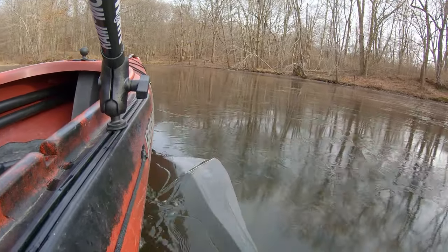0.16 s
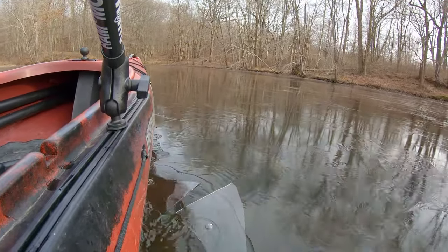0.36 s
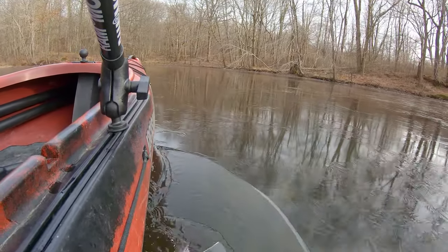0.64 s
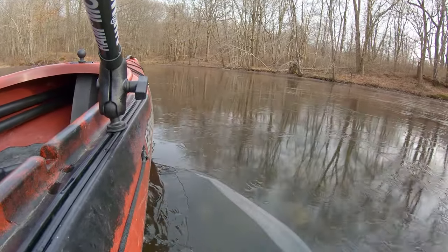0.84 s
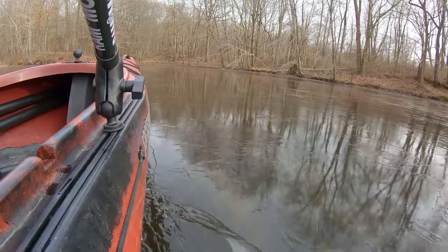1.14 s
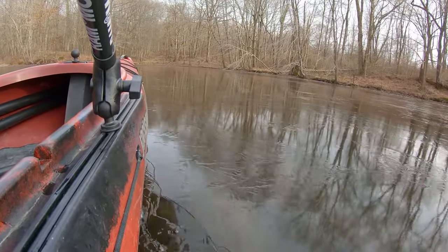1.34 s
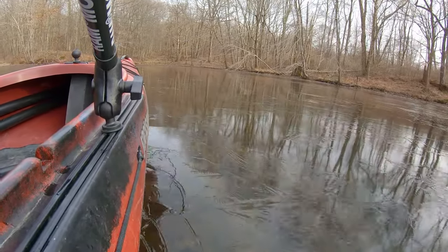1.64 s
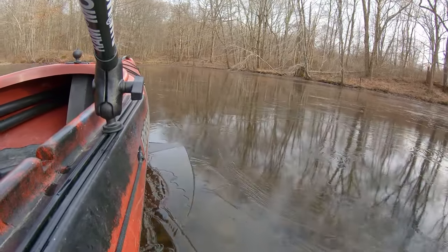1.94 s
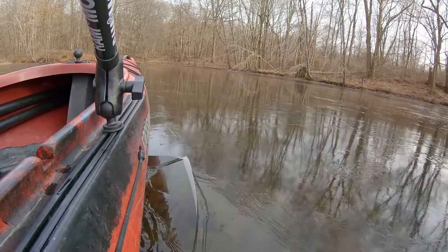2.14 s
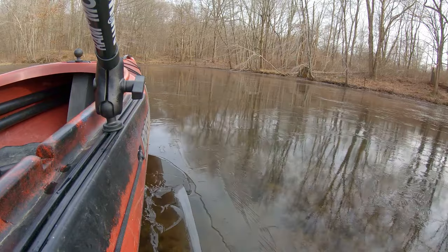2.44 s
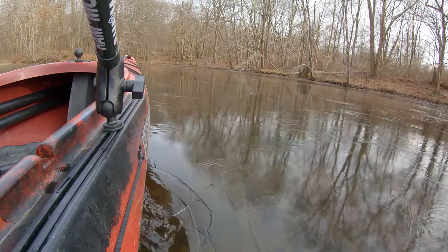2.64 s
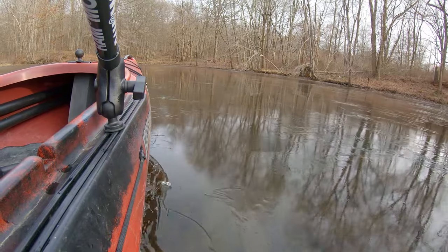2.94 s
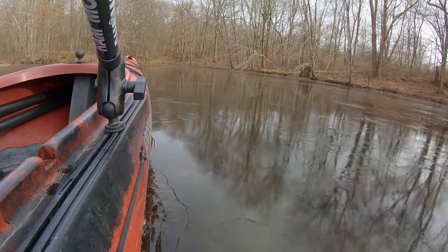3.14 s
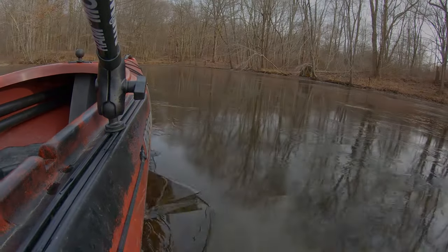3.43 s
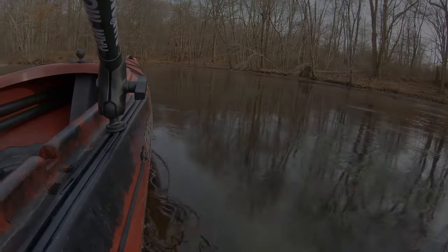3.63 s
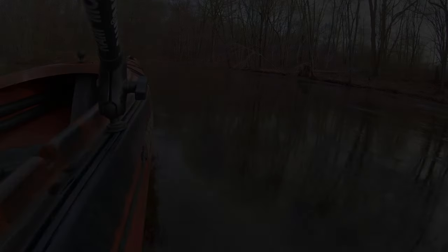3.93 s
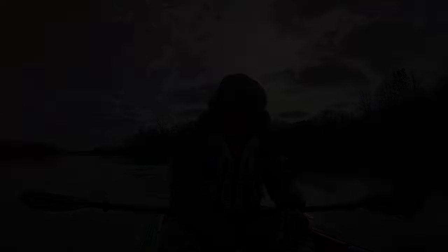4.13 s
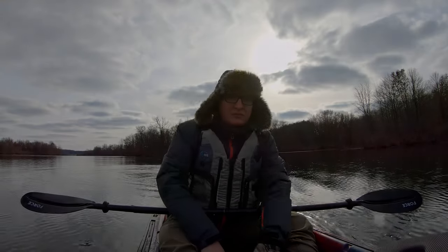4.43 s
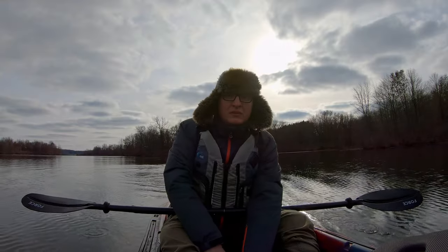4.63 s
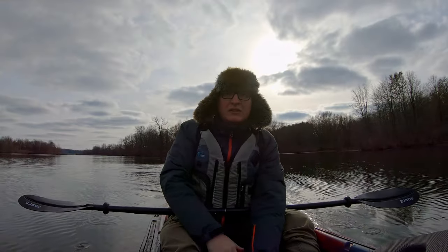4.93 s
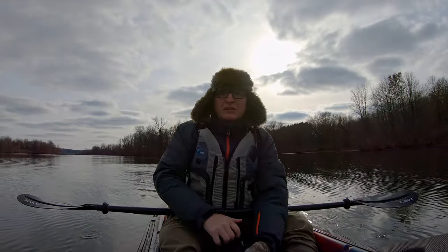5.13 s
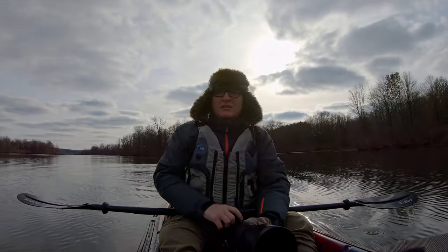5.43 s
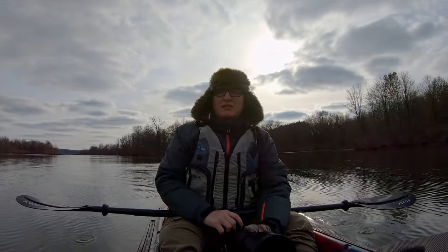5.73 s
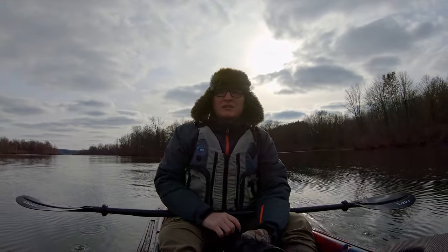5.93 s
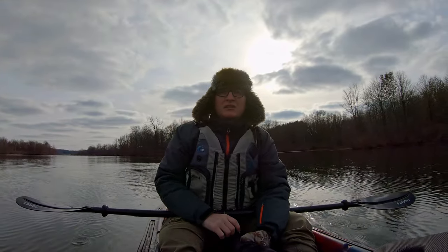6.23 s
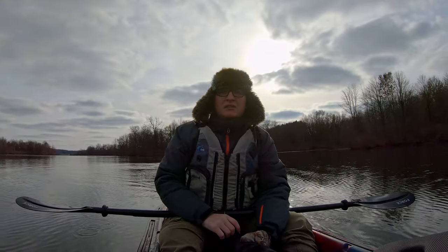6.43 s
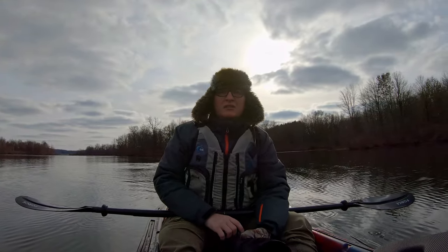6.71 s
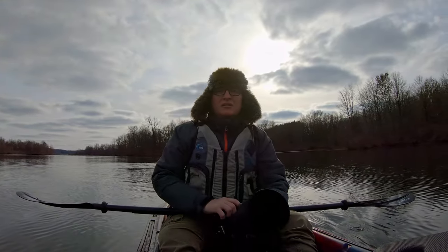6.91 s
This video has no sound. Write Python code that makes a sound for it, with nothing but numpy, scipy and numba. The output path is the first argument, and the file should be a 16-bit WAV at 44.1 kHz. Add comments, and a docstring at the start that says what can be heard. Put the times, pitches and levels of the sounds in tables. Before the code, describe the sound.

Close to a plastic kayak hull, thin ice cracks, crunches and splinters over a low heaving rumble and dull grinding, with pieces knocking on plastic. It weakens and cuts to a short silence. Then quiet open water: wind buffeting the microphone, a sleeve rasping on cloth, something heavy scraping and thumping down in the hull, a few small knocks, and very faint distant bird whistles.

```python
"""On a frozen lake a plastic kayak ploughs through thin ice: the hull rumbles and grinds, slabs crack and splinter.
The sound fades to silence, then returns on open water: wind at the microphone, a sleeve sliding over cloth,
something heavy set down in the hull, small knocks, a far bird and a faint squeak.
Friction and wind are shaped noise, fracture is a random rain of noise grains, and struck bodies are damped modes."""
import sys
import numpy as np
from scipy import signal
from scipy.fft import rfft, irfft
from scipy.io import wavfile
from scipy.ndimage import uniform_filter1d
from numba import njit

SR = 44100
rng = np.random.default_rng(int(sys.argv[2]) if len(sys.argv) > 2 else 0)


def master(y):
    """Save y as 16-bit WAV."""
    cut = np.clip(np.atleast_2d(y).T, -1, 1)
    pcm = np.round(cut * 32767)  # scale
    wavfile.write(sys.argv[1], SR, pcm.astype(np.int16))


N = 311787
T = np.arange(N) / SR  # s
FADE_OUT_S, FADE_OUT_DB = (3.968, 4.128), -19.5  # the ploughing sinks this far, then cuts


def undb(db):
    """Level law: decibels to amplitude."""
    return 10 ** (np.asarray(db) / 20)


def unit(x):
    """Normalization: rms 1."""
    return x / np.sqrt(np.mean(x ** 2))


def curves(table):
    """Linear interpolation: columns along the time axis, and a gate open only inside the table."""
    s, *columns = np.transpose(table)
    return [np.interp(T, s, c) for c in columns], (T >= s[0]) & (T <= s[-1])


def colour(x, spectrum, size=8192):
    """Minimum-phase filtering: the cepstrum gives a causal response; white noise keeps its level."""
    hz, db = np.transpose(spectrum)
    f = np.maximum(np.arange(size // 2 + 1) * SR / size, 1)
    density_db = np.maximum(np.interp(np.log(f), np.log(hz), db), -130)
    cepstrum = irfft(np.log(undb(density_db)))
    # fold the anticausal half onto the causal half
    cepstrum[1:size // 2] *= 2
    cepstrum[size // 2 + 1:] = 0
    response = irfft(np.exp(rfft(cepstrum)))
    return signal.fftconvolve(x, response / np.sqrt(np.sum(response ** 2)))[:N]


def dull(x, hz):
    """Low-pass transmission: thick plastic and water carry no treble."""
    return signal.sosfilt(signal.butter(4, hz, fs=SR, output="sos"), x)


@njit
def band(x, hz, sharp):
    """Resonance: a state-variable band-pass whose centre may move, with gain 1 at the centre."""
    y, band_state, low_state = np.empty(len(x)), 0., 0.
    for i in range(len(x)):
        g = np.tan(np.pi * hz[i] / SR)
        v = (band_state + g * (x[i] - low_state)) / (1 + g * (g + 1 / sharp))
        band_state = 2 * v - band_state
        low_state = low_state + 2 * g * v
        y[i] = v / sharp
    return y


def ring(x, hz, t60):
    """Modal decay: one damped mode, driven by x."""
    pole = np.exp(2j * np.pi * hz / SR - np.log(1000) / (t60 * SR))
    return signal.lfilter([1], [1, -pole], x).imag


def walk(rate):
    """Slow random modulation: values held 1 / rate s and slewed twice; rms 1."""
    hold = int(SR / rate)
    steps = np.repeat(rng.standard_normal(N // hold + 1), hold)
    return unit(uniform_filter1d(uniform_filter1d(steps, hold), hold)[:N])


def rain(rate, scatter_db, tail_s):
    """Shot process: envelope of a rain of tiny fractures, each with a short tail; rms 1."""
    size = np.minimum(rng.exponential(size=N), 4.5)
    hits = (rng.random(N) < rate / SR) * undb(scatter_db * size) ** 2
    power = signal.lfilter([1], [1, -np.exp(-1 / (tail_s * SR))], hits)
    return unit(np.sqrt(power))


def grit(rate, scatter_db, tail_s):
    """Modulated noise: white noise shaken by the rain of fractures."""
    return rain(rate, scatter_db, tail_s) * rng.standard_normal(N)


def bursts(times, dbs, lengths, rise_s=0.00053):
    """Transient noise: bursts rise quickly, lose 60 dB over their length, and add in power."""
    power = np.zeros(N)
    for s, db, length in zip(*np.broadcast_arrays(times, dbs, lengths)):
        i = int(s * SR)
        t = T[:min(int(2 * length * SR) + 2, N - i)]
        fall = undb(db - 60 * t / length)
        power[i:i + len(t)] += (fall * (1 - np.exp(-t / rise_s))) ** 2
    return np.sqrt(power) * rng.standard_normal(N)


def thuds(table, cycles):
    """Damped oscillation: soft low rings that build over about a cycle."""
    out = np.zeros(N)
    for s, db, hz in table:
        i = int(s * SR)
        turns = hz * T[:int(6 * cycles / hz * SR)]
        envelope = np.exp(-turns / cycles) * (1 - np.exp(-turns / 0.51))
        tone = envelope * np.sin(2 * np.pi * turns)
        out[i:i + len(turns)] += undb(db) * tone / tone.max()
    return out


def struck(table, push_s, rough):
    """Impact excitation: one mode a row, rung by a short push that rattles a little."""
    out = np.zeros(N)
    shape = np.exp(-T[:200] / push_s)
    for (start, db, hz, t60), noise in zip(table, rng.standard_normal((len(table), 200))):
        i = int(start * SR)
        push = shape * (rough * noise - shape ** 2)
        tone = ring(np.pad(push, (0, 4000)), hz, t60)
        out[i:i + len(tone)] += undb(db) * tone / np.abs(tone).max()
    return out


def pings(count, low_hz, high_hz, cycles, glide):
    """Rising resonance: damped tones at random moments and pitches up to the fade-out's end; rms 1 there."""
    out = np.zeros(N + SR)
    for when, pitch, size in rng.random((count, 3)):
        hz = low_hz * (high_hz / low_hz) ** pitch
        turns = hz * T[:int(5 * cycles / hz * SR)]
        i = int(when * FADE_OUT_S[1] * SR)
        shape = np.exp(-turns / cycles) * (1 - np.exp(-turns))
        tone = np.sin(2 * np.pi * turns * (1 + glide * turns / cycles))
        out[i:i + len(turns)] += size ** 2 * low_hz / hz * shape * tone  # higher pings are weaker
    return out[:N] / np.sqrt(np.sum(out ** 2) / (FADE_OUT_S[1] * SR))


def whistle(start, end, from_hz, to_hz, db):
    """Frequency modulation: a sine that swells and dies while it glides, its level fluttering."""
    phase = 2 * np.pi * np.cumsum(np.interp(T, [start, end], [from_hz, to_hz])) / SR
    swell = np.sqrt(np.abs(np.sin(np.pi * np.clip((T - start) / (end - start), 0, 1))))
    return undb(db) * swell * undb(2 * walk(46)) * np.sin(phase)


# In the tables below levels and lengths are relative: the functions scale them.
# the bow ploughs on (also drives grinding and ice): start_s, rumble_db, grind_db, crunch_db, shards_db, splinters_db
PLOUGH = [(0.0, -25.5, -30, -38, -47, -54), (0.03, -36.5, -36, -43, -65, -77),
          (0.16, -31.5, -36.5, -42.5, -51, -62), (0.22, -34.5, -39, -46, -65, -78),
          (0.41, -33.5, -35.5, -42.5, -54, -64), (0.46, -27, -36.5, -44, -64, -74),
          (0.53, -31.5, -32, -43, -46, -62), (0.6, -31, -31, -44.5, -50.5, -66),
          (0.74, -31, -38, -38.5, -53, -74), (0.79, -29.5, -37, -44, -59, -68),
          (0.84, -41, -30, -40.5, -52, -66), (0.98, -30, -31, -40.5, -59, -69),
          (1.17, -34.5, -35.5, -44.5, -58, -69), (1.2, -32, -32, -38.5, -52, -60),
          (1.33, -27.5, -28, -39.5, -55.5, -64.5), (1.42, -27.5, -34.5, -40.5, -53, -65),
          (1.48, -31.5, -31, -39.5, -56, -63), (1.71, -34.5, -35, -47.5, -62.5, -67.5),
          (1.99, -29.5, -33, -45.5, -61, -71), (2.06, -29, -34.5, -42, -60.5, -70),
          (2.23, -28, -36, -44, -62, -71), (2.49, -32, -35.5, -44, -60.5, -69),
          (2.6, -30.5, -37, -46.5, -65, -72), (3.12, -32.5, -37.5, -46, -67, -74),
          (3.24, -39, -40.5, -52, -65, -70), (3.36, -37, -37, -39.5, -59, -65),
          (3.39, -34.5, -40, -48.5, -71, -76), (3.45, -42, -41, -43.5, -60, -67),
          (3.53, -41, -40, -47.5, -70, -79.5), (3.66, -57, -45, -56, -62, -77.5),
          (3.68, -41, -40.5, -44, -56, -61), (3.71, -49, -46, -54.5, -72.5, -75.5),
          (3.94, -46.5, -53, -56, -69, -77)]
# rumble spectrum: freq_hz, density_db
RUMBLE_SPECTRUM = [(12, -38), (20, -23.5), (49, -11.5), (75, -0.5), (91, 2), (252, -5), (400, -18),
                   (520, -21.5), (880, -120)]
# slabs bump the hull: start_s, level_db, pitch_hz
BUMPS = [(0.11, -32, 245), (0.276, -25.5, 124.4), (0.369, -22, 99), (0.535, -31, 117), (0.757, -20, 226),
         (0.939, -26.5, 237), (1.11, -43, 93), (1.182, -23.5, 128), (1.591, -21, 167), (1.861, -24, 93),
         (2.002, -27, 87.4), (2.062, -27, 201), (2.334, -22, 93.8), (2.401, -26.5, 96),
         (2.544, -22.5, 96.5), (2.657, -23, 98), (2.741, -27, 104), (2.996, -25.5, 100), (3.329, -32, 136),
         (3.594, -41, 174), (3.679, -33, 286), (3.775, -47, 91), (3.813, -38, 89), (3.912, -39, 264)]
BOOM_HZ, PANEL_HZ = 129.8, 353
WANDER = .13  # pitches wander by this share as the ice presses elsewhere


def hull():
    """Forced vibration: broad rumble that heaves, a boom whose pitch wanders, and slabs that bump."""
    (rumble_db, *_), _ = curves(PLOUGH)
    gain = undb(rumble_db + 1.16 * walk(13))
    rumble = colour(gain * rng.standard_normal(N), RUMBLE_SPECTRUM)
    boom_hz = BOOM_HZ * np.exp(WANDER * walk(12))
    boom = unit(dull(band(rng.standard_normal(N), boom_hz, 11.8), 400))
    return rumble + gain * undb(-8.0) * boom + thuds(BUMPS, cycles=3.45)


# grinding spectrum, also of the pieces: freq_hz, density_db
GRIND_SPECTRUM = [(120, -41.5), (200, -6.5), (258, 0), (477, -10.5), (663, -5.5), (764, -11), (1000, -18),
                  (1300, -45), (2200, -120)]


def grinding():
    """Friction: slabs drag a dull grind, a panel sings at a moving pitch, water gurgles between."""
    (_, grind_db, *_), _ = curves(PLOUGH)
    grind = undb(-2.5) * colour(grit(790, 1.8, 0.0094), GRIND_SPECTRUM)
    panel_hz = PANEL_HZ * np.exp(WANDER * walk(15))
    panel = undb(-8.0) * unit(band(grit(1200, 0.92, 0.0043), panel_hz, 1.63))
    gurgle = undb(-13.5) * pings(count=450, low_hz=295.0, high_hz=1740, cycles=3.1, glide=0.041)
    return dull(undb(grind_db + 0.77 * walk(18)) * (grind + panel + gurgle), 2500)


# slabs crack: start_s, snap_db, bright_db (re snap), splinter_db (re snap), length_s
CRACKS = [(0.0578, -51, -29, -21, 0.025), (0.103, -29.5, -12.5, -21, 0.066), (0.162, -33.5, -18, -12, 0.04),
          (0.273, -39, -23, -24, 0.039), (0.287, -33, -33, -25.5, 0.081), (0.346, -33, -25, -32, 0.05),
          (0.364, -33, -23, -28, 0.048), (0.408, -24.5, -24, -26, 0.038), (0.509, -28.5, -21, -14.5, 0.026),
          (0.538, -35, -3, -27, 0.053), (0.586, -25, -5, -34, 0.017), (0.686, -24, -14.5, -34.5, 0.021),
          (0.718, -44.5, -9.5, -34, 0.032), (0.743, -28.5, -13.5, -31.5, 0.041),
          (0.797, -51, -7, -23, 0.032), (0.819, -27.5, -14.5, -28, 0.046), (0.884, -34, -28, -31, 0.055),
          (0.937, -29.5, -17, -24, 0.063), (0.988, -40, -2, -29, 0.04), (1.007, -35, -33, -35.5, 0.044),
          (1.05, -61, -25, -28, 0.032), (1.105, -39, -8, -20, 0.033), (1.167, -41, -22, -30, 0.032),
          (1.176, -41, -19, -23, 0.036), (1.215, -47, -6, -12, 0.03), (1.224, -35, -15, -23.5, 0.042),
          (1.417, -31, -18, -18, 0.031), (1.468, -33.5, -28, -25, 0.063), (1.539, -33, -11, -25, 0.031),
          (1.603, -35.5, -25, -27, 0.063), (1.672, -49, -22, -26, 0.027), (1.724, -38, -21, -14, 0.067),
          (1.831, -37.5, -21, -21, 0.056), (1.878, -38, -28, -27, 0.061), (1.917, -33, -26, -18, 0.043),
          (2.025, -31.5, -21, -35, 0.048), (2.068, -35, -33, -30, 0.07), (2.12, -51, -23, -28.5, 0.027),
          (2.137, -48, -32, -30, 0.039), (2.28, -40, -25, -23.5, 0.026), (2.308, -30.5, -21, -22, 0.04),
          (2.364, -59, -18, -22, 0.04), (2.408, -34, -17, -17, 0.038), (2.464, -38.5, -20, -19, 0.12),
          (2.51, -55, -19, -12, 0.061), (2.566, -30, -22, -19, 0.034), (2.607, -38, -19, -16, 0.038),
          (2.656, -39.5, -27, -30, 0.085), (2.711, -35.5, -10, -28, 0.04), (2.738, -62, -22, -24, 0.027),
          (2.801, -44, -13, -28, 0.059), (2.83, -39, -13, -32, 0.048), (2.863, -45.5, -11, -26, 0.04),
          (2.906, -41, -25, -33, 0.043), (2.929, -43, -15, -29, 0.098), (3.02, -38.5, -24, -27, 0.052),
          (3.129, -44.5, -28, -33, 0.073), (3.156, -39, -12, -19, 0.064), (3.269, -31.5, -14, -20, 0.045),
          (3.307, -42, -15, -23, 0.04), (3.32, -30, -22, -32, 0.033), (3.345, -29, -18, -30, 0.047),
          (3.43, -32, -12.5, -27, 0.064), (3.5575, -44, 6.5, -28, 0.016), (3.608, -45, -22, -36.5, 0.076),
          (3.667, -40.5, -10, -20, 0.095), (3.867, -49, -17, -7, 0.04), (3.904, -44.5, -11, -15, 0.061),
          (4.025, -53, -19, -19, 0.054)]
# crunch of the sheet, also in snaps and knocks: freq_hz, density_db
CRUNCH_SPECTRUM = [(560, -28), (950, -4), (1060, -1), (1560, -2), (2300, -14.5), (2990, -26.5),
                   (5060, -120)]
# hiss over the crunch: freq_hz, density_db
HISS_SPECTRUM = [(1180, -29), (2000, -3), (4800, -16), (6240, -45), (10600, -120)]
# bright crackle, also in snaps and ticks: freq_hz, density_db
CRACKLE_SPECTRUM = [(2650, -7.5), (4500, -4), (5900, -8), (7590, -6), (9300, -23), (12100, -46.5),
                    (20500, -120)]
# finest splinters: freq_hz, density_db
SPLINTER_SPECTRUM = [(5290, -22.5), (9000, -0.5), (9360, -3), (10500, 5), (11400, 1), (12700, 2),
                     (15600, -13.5)]


def ice():
    """Brittle fracture: steady crushing and single cracks share the colours of sheet, shards and splinters."""
    (_, _, crunch_db, shards_db, creep_db), _ = curves(PLOUGH)
    s, snap_db, bright_db, sharp_db, length = np.transpose(CRACKS)
    surge = walk(16)
    jagged = rain(900, 1.2, 0.0015)  # a crack runs in small steps
    gain = undb(crunch_db - 3.5 + 1.53 * surge)
    fine = undb(shards_db - 3.5 + 2.0 * surge)
    creep = undb(creep_db - 1.0 + 1.5 * surge)

    crunch = gain * undb(0.5) * grit(700, 2.2, 0.008)
    crunch += bursts(s, snap_db - 3.5, 1.64 * length, rise_s=0.0035)
    hiss = gain * undb(-5.5) * grit(450, 2.6, 0.004)
    hiss += jagged * bursts(s, snap_db - 3.5, length, rise_s=0.0032)
    crackle = fine * undb(1.5) * grit(450, 2.0, 0.0035)
    crackle += jagged * bursts(s, snap_db + bright_db + 1.0, 1.1 * length, rise_s=0.0027)
    splinter = creep * grit(520, 1.9, 0.0028)
    splinter += jagged * bursts(s, snap_db + sharp_db - 7, 2.1 * length)

    # loose shards chime
    chime = fine * undb(-10.5) * pings(count=400, low_hz=3900, high_hz=8100, cycles=8.5, glide=.003)
    chime += gain * undb(-3.5) * pings(count=600, low_hz=702, high_hz=3760, cycles=6.7, glide=.004)
    sheet = colour(crunch, CRUNCH_SPECTRUM) + colour(hiss, HISS_SPECTRUM)
    return sheet + colour(crackle, CRACKLE_SPECTRUM) + colour(splinter, SPLINTER_SPECTRUM) + chime


# the loudest brittle snaps, each shard with its own note: start_s, level_db, pitch_hz, t60_s
SNAPS = [(0.0153, -43, 1050, 0.02), (0.0628, -39, 1350, 0.02), (0.105, -26, 1320, 0.018),
         (0.165, -29, 2200, 0.022), (0.2706, -37, 1250, 0.02), (0.2912, -33, 930, 0.028),
         (0.339, -35, 1220, 0.02), (0.3518, -28, 1210, 0.031), (0.375, -27, 1510, 0.02),
         (0.412, -29, 1300, 0.014), (0.4646, -35.5, 937, 0.02), (0.4816, -35.5, 988, 0.02),
         (0.5089, -22, 1320, 0.018), (0.5352, -25.5, 910, 0.02), (0.59, -24.5, 910, 0.02),
         (0.6452, -24, 902, 0.018), (0.687, -27.5, 1630, 0.018), (0.697, -24.5, 960, 0.029),
         (0.7176, -26, 1110, 0.034), (0.7907, -25, 1020, 0.02), (0.821, -21.5, 1230, 0.027),
         (0.855, -24.5, 1020, 0.025), (0.875, -24.5, 1640, 0.049), (0.9158, -23.5, 902, 0.032),
         (1.1185, -23, 1090, 0.029), (1.149, -33, 960, 0.026), (1.1696, -24, 930, 0.036),
         (1.2363, -21, 970, 0.036), (1.405, -24.5, 900, 0.013), (1.5246, -34, 1220, 0.02),
         (1.624, -30, 912, 0.018), (1.675, -37, 1260, 0.02), (1.708, -37, 1210, 0.02),
         (1.766, -29.5, 1240, 0.041), (1.922, -32, 880, 0.024), (1.9919, -39, 1300, 0.02),
         (2.016, -28, 1640, 0.024), (2.064, -25, 930, 0.018), (2.1301, -47, 1130, 0.02),
         (2.144, -43, 945, 0.02), (2.175, -34, 1210, 0.02), (2.251, -28, 934, 0.02),
         (2.285, -30, 1250, 0.02), (2.31, -28, 1200, 0.027), (2.4573, -34, 1180, 0.02),
         (2.4962, -27.5, 1040, 0.022), (2.5356, -45, 902, 0.02), (2.5672, -27.5, 1510, 0.02),
         (2.606, -31, 961, 0.02), (2.657, -38, 1210, 0.02), (2.7107, -28, 970, 0.02),
         (2.9487, -29, 990, 0.027), (2.9806, -29, 905, 0.02), (3.0235, -34, 1760, 0.032),
         (3.0856, -48, 902, 0.02), (3.274, -33, 1220, 0.022), (3.316, -32, 934, 0.018),
         (3.352, -29, 920, 0.013), (3.4317, -29, 1570, 0.016), (3.5585, -41, 931, 0.02),
         (3.6017, -42, 910, 0.017), (3.674, -34, 1160, 0.025), (3.7354, -43, 1420, 0.02),
         (3.8717, -40, 1170, 0.02), (3.91, -43, 1054, 0.018)]


def snaps():
    """Impulsive fracture: a sharp click and a rough, short ring at the pitch of its shard."""
    s, db, _, _ = np.transpose(SNAPS)
    click = bursts(s, db, 0.0038, rise_s=0.00015)
    note = undb(-4.0) * struck(SNAPS, push_s=0.00057, rough=0.5)
    return note + 0.13 * colour(click, CRACKLE_SPECTRUM) + 0.45 * colour(click, CRUNCH_SPECTRUM)


# splinters of the sheet shiver at their own pitch: start_s, level_db, pitch_hz, length_s
SHARDS = [(0.059, -41, 2260, 0.05), (0.107, -31, 2180, 0.05), (0.156, -32, 2210, 0.05),
          (0.166, -28, 2170, 0.055), (0.2723, -35, 2090, 0.054), (0.288, -33, 2220, 0.05),
          (0.3376, -38, 2210, 0.05), (0.367, -31, 2000, 0.05), (0.408, -28, 2600, 0.05),
          (0.505, -32, 2100, 0.046), (0.534, -31, 2070, 0.046), (0.5896, -30, 2250, 0.05),
          (0.637, -38, 2010, 0.05), (0.688, -37, 2220, 0.046), (0.72, -32, 2220, 0.039),
          (0.734, -27.5, 3300, 0.053), (0.792, -45, 2840, 0.05), (0.8215, -34, 2060, 0.05),
          (0.876, -35, 2000, 0.045), (0.915, -39, 2300, 0.05), (0.943, -38, 2320, 0.045),
          (0.9921, -39, 2420, 0.043), (1.008, -35, 3070, 0.043), (1.057, -44, 2840, 0.043),
          (1.108, -36, 2310, 0.05), (1.17, -37, 2550, 0.05), (1.18, -32, 2100, 0.05),
          (1.21, -39, 2250, 0.05), (1.2311, -30, 3180, 0.05), (1.295, -29, 2010, 0.055),
          (1.314, -36, 2510, 0.05), (1.404, -28, 2020, 0.05), (1.47, -31, 2080, 0.05),
          (1.536, -34, 2200, 0.05), (1.595, -39, 2820, 0.05), (1.67, -33.5, 2180, 0.05),
          (1.71, -36, 2060, 0.054), (1.731, -38, 2560, 0.05), (1.836, -38, 2000, 0.05),
          (1.8791, -35, 2190, 0.05), (1.92, -29.5, 2540, 0.061), (2.017, -31.5, 2450, 0.077),
          (2.088, -40, 2230, 0.05), (2.1171, -51, 2230, 0.05), (2.1316, -45, 2650, 0.046),
          (2.1545, -45, 2120, 0.05), (2.282, -31, 2470, 0.055), (2.306, -31, 2020, 0.05),
          (2.3705, -42, 2450, 0.05), (2.397, -36, 2410, 0.05), (2.4633, -39, 2090, 0.05),
          (2.535, -44, 2020, 0.05), (2.562, -34, 3180, 0.055), (2.602, -35, 2010, 0.05),
          (2.63, -45, 3100, 0.05), (2.6579, -41, 2380, 0.05), (2.713, -45, 2400, 0.045),
          (2.742, -49, 2650, 0.04), (2.796, -39, 2560, 0.05), (2.804, -37, 2650, 0.05),
          (2.824, -41, 2200, 0.05), (2.8639, -43, 2160, 0.05), (2.8958, -43, 2510, 0.05),
          (2.932, -40, 2190, 0.055), (2.978, -39, 2320, 0.05), (3.022, -39, 2070, 0.05),
          (3.124, -42, 2620, 0.05), (3.1617, -40, 2540, 0.05), (3.272, -34, 2300, 0.05),
          (3.317, -41, 2110, 0.05), (3.32, -36, 2280, 0.05), (3.352, -33, 2220, 0.056),
          (3.429, -30, 2390, 0.056), (3.49, -44, 2410, 0.05), (3.555, -50, 2680, 0.046),
          (3.604, -39, 4240, 0.046), (3.669, -39, 2340, 0.045), (3.855, -56, 2210, 0.05),
          (3.874, -47, 2570, 0.05), (3.906, -39, 2190, 0.054), (4.0153, -59, 2610, 0.05)]


def shards():
    """Narrow-band resonance: each shard is shaken for a moment and sings in its own band."""
    s, db, hz, length = np.transpose(SHARDS)
    shake = bursts(s, db, length, rise_s=0.0027)
    latest = np.clip(np.searchsorted(s, T) - 1, 0, None)  # the band holds the latest shard's pitch
    return undb(8.5) * dull(band(shake, hz[latest], 5.0), 7200)


# thin ticks of ice that sticks and slips: start_s, level_db, dull_db (re level), length_s
TICKS = [(0.1047, -51.5, 13, 0.018), (0.1123, -61, 19.5, 0.02), (0.1656, -43, 9, 0.0035),
         (0.2728, -65, 20, 0.0056), (0.2898, -59, 8, 0.016), (0.295, -60, 16, 0.0038),
         (0.306, -67, 22, 0.0062), (0.34, -63, 24, 0.003), (0.3485, -63, 20, 0.0035),
         (0.3659, -67, 22, 0.012), (0.411, -54, 21, 0.0049), (0.4161, -54, 8, 0.018),
         (0.42, -61, 19, 0.0069), (0.4786, -62, 9, 0.02), (0.509, -46, 9.5, 0.0128), (0.516, -47, 6, 0.003),
         (0.539, -57, 21.5, 0.0097), (0.556, -56, 19, 0.0132), (0.591, -54.5, 16, 0.02),
         (0.659, -56, 12.5, 0.017), (0.691, -60.5, 21, 0.015), (0.7364, -57, 24.5, 0.0048),
         (0.742, -64, 31, 0.0038), (0.7579, -60, 13.5, 0.018), (0.8251, -60, 19, 0.02),
         (0.8813, -58, 14.5, 0.017), (0.9355, -53, 10.5, 0.016), (0.9499, -59, 20, 0.0059),
         (0.99, -53, 10.5, 0.018), (1.0167, -69, 26, 0.0039), (1.102, -62, 26, 0.003),
         (1.1108, -57, 10, 0.02), (1.1188, -50, 3, 0.0034), (1.1869, -55, 7, 0.003),
         (1.231, -49, 8, 0.0084), (1.238, -65, 22.5, 0.016), (1.378, -54.5, 9.5, 0.0162),
         (1.4061, -53, 14.5, 0.0035), (1.4208, -51, 5, 0.003), (1.437, -57, 15.5, 0.0046),
         (1.4688, -50, 5.5, 0.003), (1.48, -57, 14.5, 0.0139), (1.4986, -55, 6.5, 0.003),
         (1.54, -38.5, 7, 0.0044), (1.5639, -50, 3, 0.003), (1.568, -53, -2, 0.0181),
         (1.5759, -48, -1, 0.003), (1.6122, -56, 9, 0.0064), (1.6735, -45, 5, 0.003),
         (1.694, -52, -3, 0.0064), (1.6987, -50, -7, 0.003), (1.7181, -38, -15, 0.003),
         (1.722, -47, -3, 0.0072), (1.7293, -44, -4, 0.0031), (1.7459, -48, -5, 0.0101),
         (1.847, -44, -6, 0.0043), (1.85, -43, -5.5, 0.0033), (1.8795, -64, 17, 0.0073),
         (1.921, -52, 5, 0.015), (1.9232, -48, 7, 0.0038), (1.9288, -58, 8, 0.018), (2.015, -70, 21, 0.01),
         (2.1893, -58, 8, 0.0146), (2.311, -61, 19.5, 0.0084), (2.3352, -54, 3, 0.003),
         (2.3712, -57, 4, 0.003), (2.4043, -62.5, 15, 0.011), (2.4106, -53, 2, 0.003),
         (2.4139, -51, 4, 0.003), (2.4407, -57, 4, 0.0069), (2.464, -58, 11, 0.017), (2.494, -58, 12, 0.02),
         (2.5093, -52, 4, 0.003), (2.5251, -56, -2, 0.0061), (2.5662, -53, 12, 0.0079),
         (2.5729, -63, 14, 0.0073), (2.6048, -64, 9, 0.018), (2.6077, -63, 9, 0.02),
         (2.6676, -71, 23, 0.0035), (2.805, -68, 22, 0.0034), (2.8642, -73, 23, 0.0139),
         (2.948, -60, 9, 0.018), (2.972, -49, 1, 0.0054), (3.1036, -65, 8, 0.0091), (3.121, -76, 26, 0.009),
         (3.1294, -74, 25, 0.0041), (3.147, -73, 27, 0.003), (3.1599, -53, 7, 0.0033),
         (3.1663, -49, 3, 0.003), (3.1726, -53, 1, 0.003), (3.1816, -51, 3, 0.003),
         (3.1946, -51, -3, 0.003), (3.2041, -53, 0, 0.0033), (3.2138, -51, -1, 0.003),
         (3.223, -50, 0, 0.0041), (3.23, -54, -2, 0.003), (3.2353, -55, 0.5, 0.003),
         (3.2401, -54, -2, 0.003), (3.2515, -55, -3.5, 0.003), (3.266, -52, 1, 0.0084),
         (3.2728, -52, 2, 0.0136), (3.3236, -57.5, 9, 0.018), (3.351, -58, 20.5, 0.0048),
         (3.4315, -58, 16, 0.018), (3.439, -53.5, 12, 0.014), (3.455, -56.5, 12.5, 0.016),
         (3.5094, -66, 11, 0.015), (3.5591, -65, 23, 0.003), (3.6, -69, 21, 0.0079), (3.63, -62, 6, 0.0042),
         (3.6347, -63, 0, 0.003), (3.674, -52, 10, 0.0079), (3.6767, -51, 4, 0.0113),
         (3.7302, -64, 0, 0.003), (3.771, -48, -9, 0.0034), (3.7956, -58, 2, 0.0073),
         (3.846, -63, -2, 0.02), (3.8923, -58, -4, 0.003), (3.9101, -53, 4, 0.0044),
         (3.9896, -68, 2, 0.0076)]
# bright part of a tick: freq_hz, density_db
TICK_SPECTRUM = [(6500, -24), (10500, -4.5), (12600, 0), (15600, -6.5)]


def ticks():
    """Stick-slip: a bright click with a duller one under it; the shorter the slip, the harder it hits."""
    s, db, low_db, length = np.transpose(TICKS)
    db = db + 3.0 * np.log2(0.01 / length)
    bright = bursts(s, db + 6.0, length, rise_s=0.00043)
    duller = bursts(s, db + low_db + 3.5, 0.93 * length, rise_s=0.00047)
    return colour(bright, TICK_SPECTRUM) + colour(duller, CRACKLE_SPECTRUM)


# broken pieces knock on the plastic: start_s, level_db, pitch_hz, t60_s
PIECES = [(0.166, -31, 407, 0.012), (0.273, -29, 370, 0.045), (0.349, -32, 348, 0.092),
          (0.375, -23, 550, 0.042), (0.415, -30.5, 440, 0.084), (0.463, -17.5, 370, 0.023),
          (0.509, -11, 666, 0.0066), (0.534, -14, 390, 0.049), (0.589, -35, 550, 0.044),
          (0.646, -14, 620, 0.019), (0.697, -13.5, 870, 0.025), (0.719, -21, 695, 0.15),
          (0.727, -15.5, 692, 0.077), (0.736, -24, 684, 0.091), (0.754, -14.5, 350, 0.069),
          (0.817, -18.5, 586, 0.055), (0.995, -22.5, 624, 0.16), (1.088, -23, 440, 0.069),
          (1.117, -14.5, 385, 0.04), (1.129, -25, 900, 0.04), (1.179, -18.5, 570, 0.065),
          (1.195, -20, 855, 0.045), (1.227, -19, 594, 0.055), (1.249, -21, 910, 0.036),
          (1.288, -26, 760, 0.05), (1.322, -18.5, 620, 0.072), (1.358, -17.5, 613, 0.05),
          (1.511, -21.5, 516, 0.051), (1.6, -36, 623, 0.04), (1.673, -44, 362, 0.035),
          (1.734, -21, 385, 0.022), (1.836, -20, 355, 0.032), (1.874, -22, 655, 0.044),
          (1.936, -26, 437, 0.057), (1.967, -36, 353, 0.029), (2.13, -35, 516, 0.064),
          (2.184, -42, 368, 0.051), (2.247, -32, 526, 0.047), (2.31, -22, 633, 0.066),
          (2.409, -26, 347, 0.033), (2.568, -27, 436, 0.031), (2.603, -35, 566, 0.036),
          (2.658, -27, 634, 0.037), (2.706, -26, 357, 0.054), (2.757, -21, 373, 0.033),
          (2.839, -28, 438, 0.07), (2.965, -24, 438, 0.046), (2.989, -21.5, 546, 0.082),
          (3.13, -40, 409, 0.04), (3.27, -28, 686, 0.065), (3.28, -20, 431, 0.017), (3.31, -25, 590, 0.047),
          (3.351, -28, 385, 0.078), (3.404, -36, 400, 0.04), (3.432, -27, 1624, 0.11),
          (3.505, -23.5, 540, 0.037), (3.676, -30.5, 420, 0.17), (3.819, -36, 535, 0.053),
          (3.87, -37.5, 533, 0.057), (3.909, -36.5, 666, 0.12), (4.021, -41, 690, 0.1)]


def pieces():
    """Impact: each piece gives a dull crunch and a short ring at its own pitch."""
    s, db, _, t60 = np.transpose(PIECES)
    crunch = colour(bursts(s, db - 10, 1.23 * t60), GRIND_SPECTRUM)
    note = undb(-7.0) * struck(PIECES, push_s=0.00065, rough=0.33)
    return dull(crunch + note, 3900)


# gusts: start_s, wind_db
GUSTS = [(4.33, -49.5), (4.42, -45), (4.72, -42.5), (4.82, -25.5), (5.0, -37), (5.2, -42), (5.8, -44.5),
         (6.3, -45.5), (7.07, -40)]
# wind spectrum: freq_hz, density_db
WIND_SPECTRUM = [(12, -53), (20, -24), (41, -8), (67, 1), (86, -2), (128, -10), (178, -5), (290, -22),
                 (300, -27), (390, -34), (660, -120)]
# single buffets of wind on the microphone: start_s, level_db, pitch_hz
BUFFETS = [(4.397, -29, 69.5), (4.459, -39, 81), (4.658, -30.5, 74), (4.999, -33, 76), (5.219, -31.5, 75.6),
           (5.518, -54, 59.5), (5.629, -43, 70), (5.944, -36, 73), (6.147, -30, 78), (6.273, -28.5, 74.4),
           (6.392, -42, 60), (6.582, -38, 65), (6.814, -41, 95), (6.89, -50, 78)]
# air over the lake: freq_hz, density_db
AIR_SPECTRUM = [(88, -23.5), (150, -2.5), (233, -9), (285, -5.5), (324, -8.5), (419, -11.5), (500, -13),
                (545, -8.5), (585, -19), (625, -23.5), (687, -18.5), (739, -30.5), (1570, -35.5),
                (1850, -39), (1950, -43), (5000, -47), (10500, -59), (11300, -64), (11900, -92),
                (15600, -102), (22000, -120)]
# the sleeve's strokes: start_s, sleeve_db
RUB = [(4.35, -50.5), (4.42, -46.5), (4.58, -45.5), (4.68, -49.5), (4.74, -54.5), (4.93, -56.5),
       (5.05, -48), (5.3, -51.5), (5.6, -57.5), (5.75, -64), (6.02, -70.5), (6.15, -83), (6.64, -83),
       (6.73, -65), (6.84, -66.5), (6.93, -59.5), (7.07, -53)]
# sleeve on cloth, also in knocks: freq_hz, density_db
SLEEVE_SPECTRUM = [(470, -43), (800, -22), (999, -16), (1120, -13), (1220, -7), (1400, -7), (2130, -1),
                   (3690, 0.5), (5480, -14), (6380, -16.5), (8250, -20.5), (9600, -24.5), (10600, -29.5),
                   (11300, -36), (11900, -70)]
AIR_DB, FADE_IN_S = -47, (4.315, 4.38)


def open_water():
    """Turbulence and friction: wind buffets, air hums evenly, the sleeve rasps over the weave; all fade in."""
    wind = undb(curves(GUSTS)[0][0] + 1.0 + 3.8 * walk(13)) * rng.standard_normal(N)
    air = undb(AIR_DB + 0.46 * walk(4.99)) * rng.standard_normal(N)
    sleeve = undb(curves(RUB)[0][0] + 0.62 * walk(28)) * grit(2800, 0.97, 0.0048)
    fade = np.interp(T, FADE_IN_S, [0, 1]) ** 2
    blowing = colour(wind, WIND_SPECTRUM) + thuds(BUFFETS, cycles=2.2) + colour(air, AIR_SPECTRUM)
    return fade * (blowing + colour(sleeve, SLEEVE_SPECTRUM))


# the load scrapes to rest: start_s, push_db, scrape_db
SET_DOWN = [(4.754, -33, -37), (4.757, -23.5, -39), (4.766, -22.5, -40), (4.772, -25, -35),
            (4.783, -17.5, -33), (4.8, -21.5, -32), (4.815, -22, -48), (4.835, -36, -59), (4.94, -40, -80),
            (5.0, -60, -90)]
# hull modes: pitch_hz, level_db, t60_s
HULL_MODES = [(110, -14, 0.5), (133, -13, 0.33), (228.6, -6, 0.28), (265, -9, 0.25), (299, 7.5, 0.047),
              (377, -10, 0.2), (442, -16.5, 0.32), (560, -10.5, 0.11), (600, -18.5, 0.068),
              (887, -22, 0.11), (1360, -23.5, 0.14), (1347, -26, 0.16)]
# scrape spectrum: freq_hz, density_db
SCRAPE_SPECTRUM = [(410, -40), (700, -4), (759, -37), (881, -8), (1150, -6), (1500, 3.5), (2000, -5),
                   (2270, -1), (2860, -5.5), (3900, -15), (4320, -30), (4800, -11), (5380, -38),
                   (9690, -37), (11000, -60), (14300, -91), (22000, -120)]
# what the load rings with: pitch_hz, width_hz, level_db
LOAD = [(895, 26, 4), (1470, 150, -8.5), (2180, 28, -12), (2680, 25, -11), (3000, 44, -10.5),
        (3270, 54, -12), (3850, 37, -10), (3940, 54, -12), (4730, 40, -23)]
# it brushes the rim, touches down in jolts, its weight lands, then it rocks once: start_s, level_db, pitch_hz
LANDING = [(4.582, -34.5, 390), (4.7545, -23.5, 298), (4.769, -18.5, 222), (4.781, -16.5, 310.4),
           (4.803, -21, 110.3), (4.807, -20, 283), (4.829, -26, 120), (4.858, -27.5, 225),
           (4.92, -25.5, 216)]


def set_down():
    """Modal excitation: a juddering push rings the hull, the load scrapes and rings, its weight lands."""
    (push_db, scrape_db), on = curves(SET_DOWN)
    push = dull(on * undb(push_db) * grit(1700, 0.76, 0.004), 1950)
    body = sum(undb(db) * ring(push, hz, 0.87 * min(t60, .5)) for hz, db, t60 in HULL_MODES)
    scrape = on * undb(scrape_db) * grit(400, 1.6, 0.0044)
    load = sum(undb(db) * band(scrape, np.full(N, 1. * hz), hz / (1.0 * width)) for hz, width, db in LOAD)
    scraping = undb(-3.0) * colour(scrape, SCRAPE_SPECTRUM) + undb(15.5) * dull(load, 6600)
    return undb(-29.5) * body + scraping + thuds(LANDING, cycles=3.4)


# small knocks of gear: start_s, level_db, pitch_hz
KNOCKS = [(4.583, -32, 2560), (4.6661, -26, 1900), (4.8574, -34, 1900), (4.89, -44, 3100),
          (5.0481, -32, 3000), (5.0937, -43, 2400), (5.896, -49, 4500), (6.3445, -53, 2000)]


def knocks():
    """Damped impact: each knock is a dull click with a ring of a few milliseconds."""
    s, db, hz = np.transpose(KNOCKS)
    click = bursts(s, db + 0.5, 0.0067, rise_s=0.00013)
    note = dull(band(click, np.interp(T, s, hz), 3.7), 6000)
    return 0.27 * colour(click, SLEEVE_SPECTRUM) + 0.36 * colour(click, CRUNCH_SPECTRUM) + 1.9 * note


# far bird notes: start_s, end_s, pitch_hz, level_db
BIRD = [(5.83, 5.95, 1860, -69), (5.98, 6.07, 1780, -71), (6.16, 6.27, 1830, -69.5),
        (6.28, 6.34, 1750, -73)]
# a faint rising squeak: start_s, end_s, from_hz, to_hz, level_db
SQUEAK = [(6.085, 6.105, 6800, 7900, -76), (6.075, 6.095, 9400, 10300, -80)]


def bird():
    """Gliding pure tones: faint whistles that sag a little, and a rising squeak."""
    notes = sum(whistle(start, end, hz, .995 * hz, db) for start, end, hz, db in BIRD)
    return notes + sum(whistle(*row) for row in SQUEAK)


def scene():
    """Superposition: the ploughing fades out, then the sounds of open water follow."""
    ploughing = hull() + grinding() + ice() + snaps() + shards() + ticks() + pieces()
    fade = undb(np.interp(T, FADE_OUT_S, [0, FADE_OUT_DB])) * (T < FADE_OUT_S[1])
    return (fade * ploughing + open_water() + set_down() + knocks() + bird())[None]


LOW_CUT_HZ, TOP_HZ = 29, 15650


def record(dry):
    """Band limiting: the camera thins the deepest bass and cuts the top."""
    thin = signal.sosfilt(signal.butter(2, LOW_CUT_HZ, "high", fs=SR, output="sos"), dry)
    return signal.sosfilt(signal.ellip(10, .2, 80, TOP_HZ, fs=SR, output="sos"), thin)


dry = scene()
out = record(dry)
master(out)
```